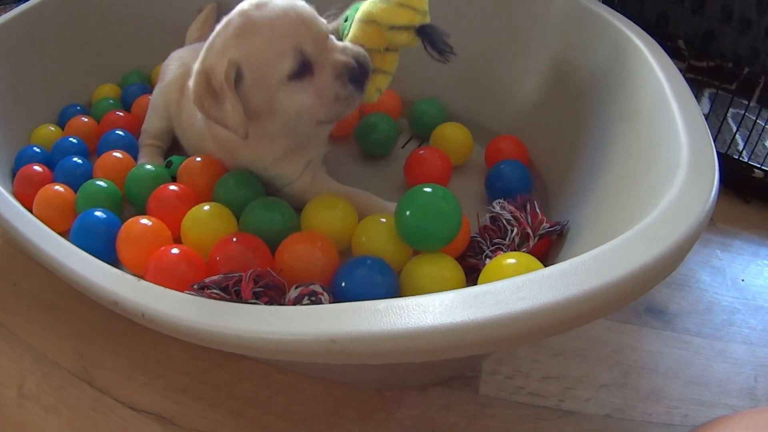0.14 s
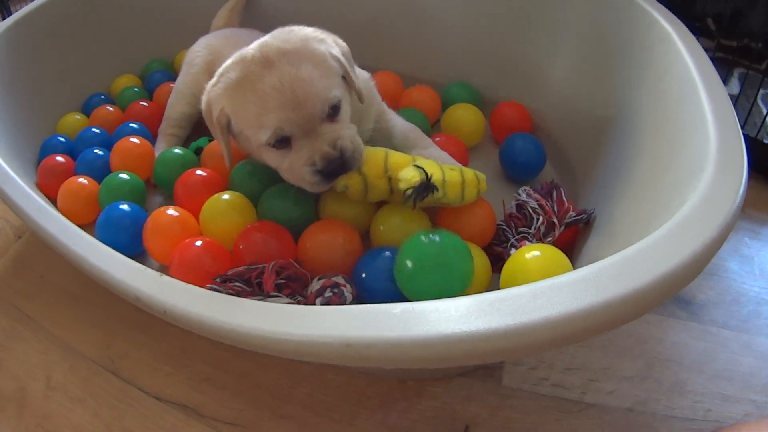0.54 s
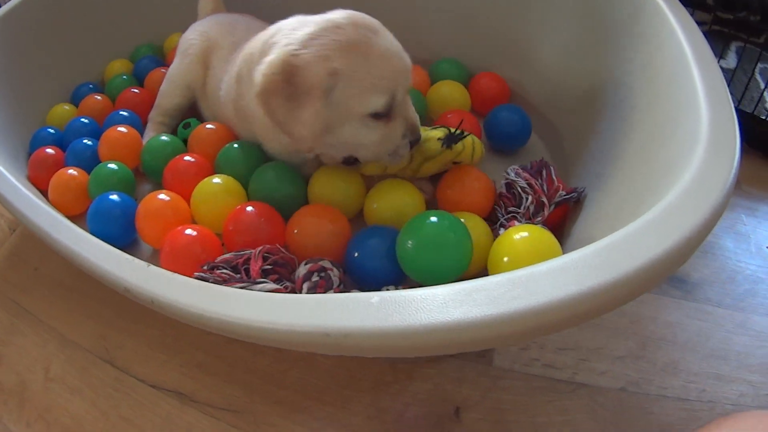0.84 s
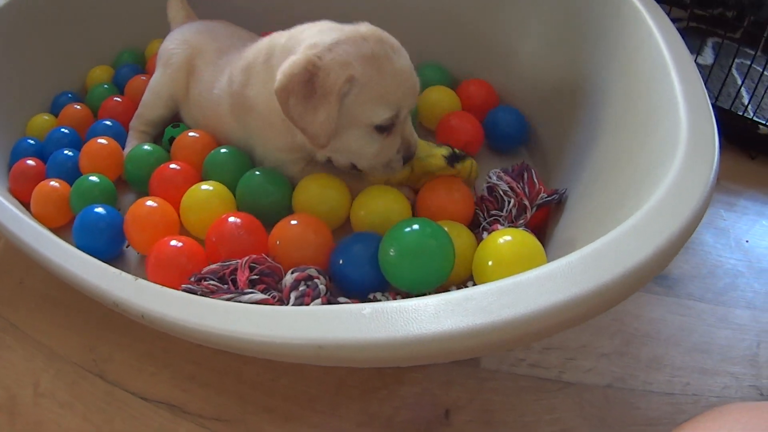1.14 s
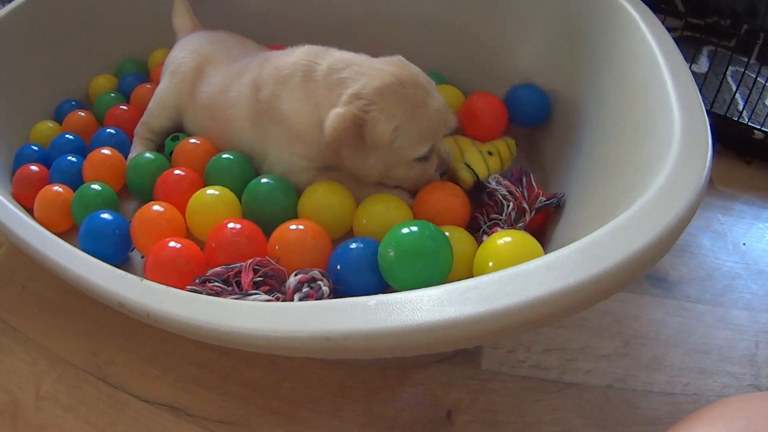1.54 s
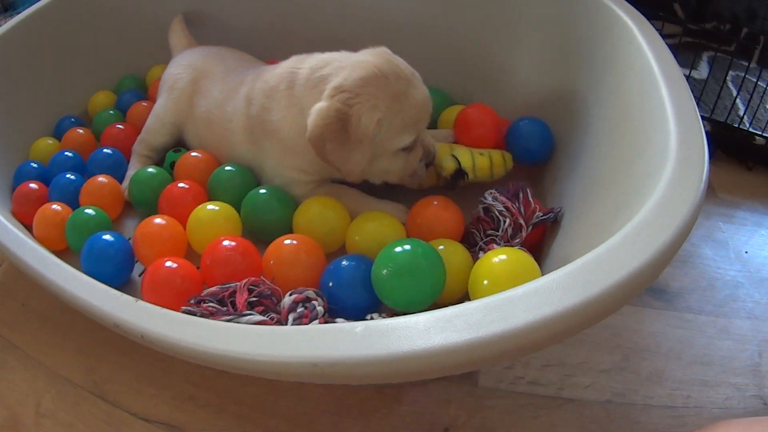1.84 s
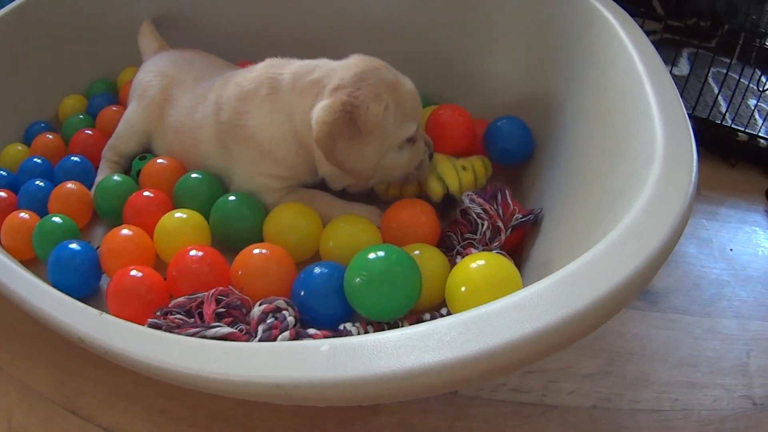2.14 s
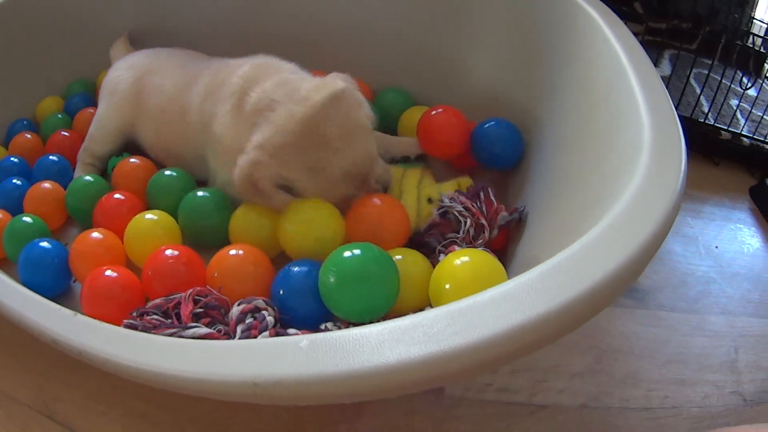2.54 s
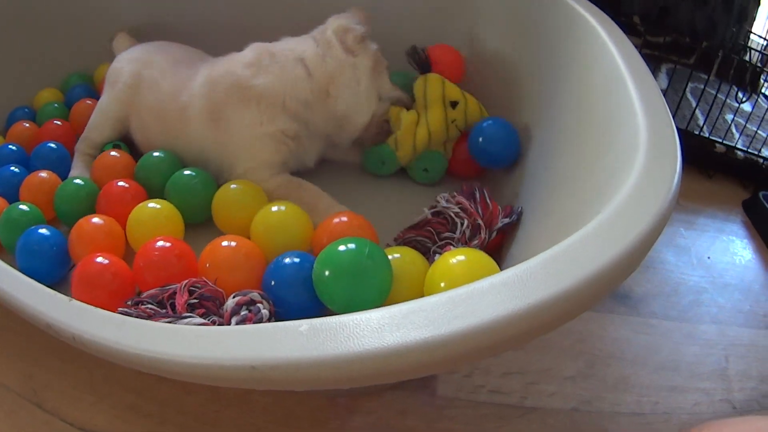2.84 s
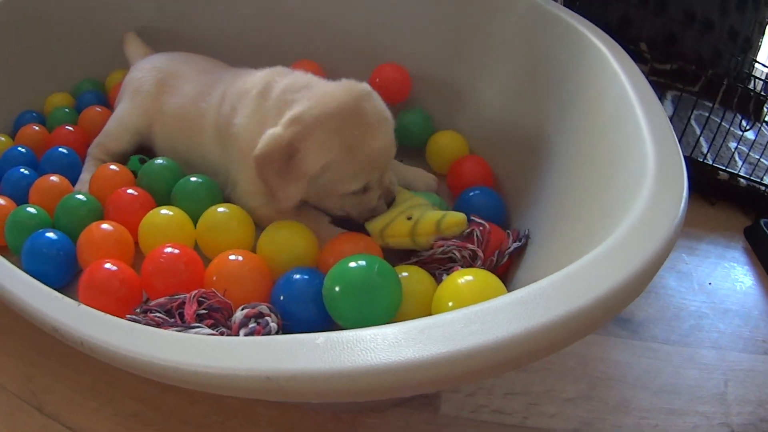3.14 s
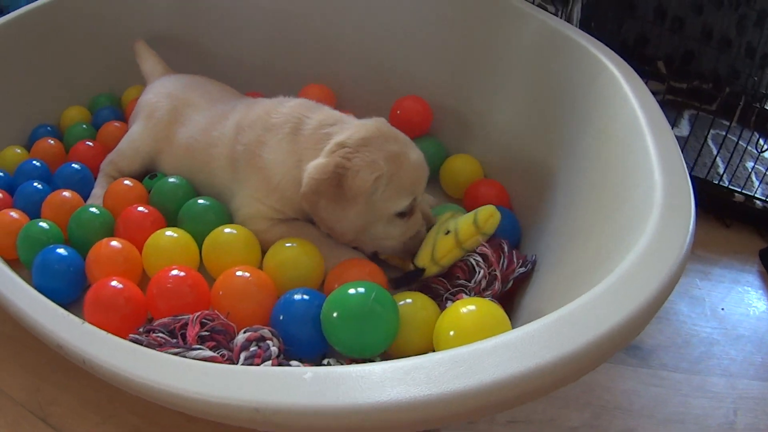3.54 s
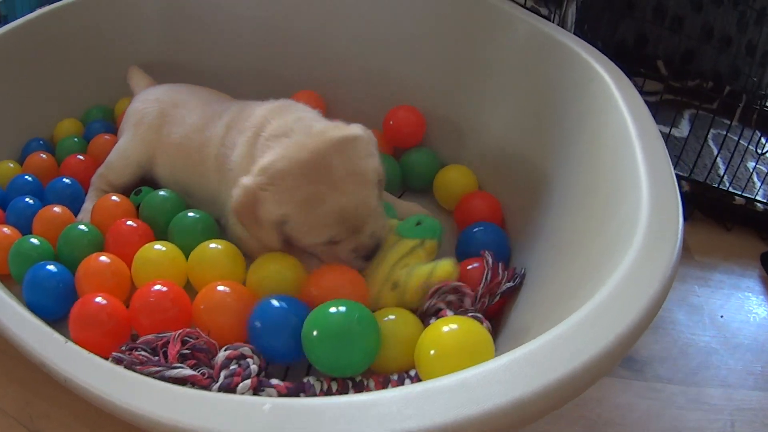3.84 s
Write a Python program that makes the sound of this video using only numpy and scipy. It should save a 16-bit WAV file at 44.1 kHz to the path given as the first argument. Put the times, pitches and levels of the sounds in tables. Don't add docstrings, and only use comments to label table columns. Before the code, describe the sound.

Hollow plastic balls clatter and thump in a plastic tub as a puppy shakes a soft toy, ease into sparse knocks, then burst out harder before settling; close stereo microphones, quiet room with low hum.

```python
import sys
import numpy as np
from scipy import signal
from scipy.fft import rfft, irfft
from scipy.io import wavfile
from scipy.ndimage import uniform_filter1d

SR = 44100
rng = np.random.default_rng(int(sys.argv[2]) if len(sys.argv) > 2 else 0)


def volts(x):
    e = np.asarray(x, float) / 20
    return 10 ** e


def wav_record(signal):
    frames = np.transpose(np.atleast_2d(signal))
    bounded = np.clip(frames, -1, 1)
    quanta = np.round(bounded * 32767).astype(np.int16)
    wavfile.write(sys.argv[1], SR, quanta)


N = 176400


def evened(x):
    return x / np.sqrt(np.mean(x ** 2) + 1e-20)


def read(points, hz):
    f, value = np.transpose(points)
    return np.interp(np.log(hz + 1), np.log(f + 1), value)


def shape(x, gain):
    return irfft(rfft(x) * gain(np.fft.rfftfreq(N, 1 / SR)), N)


def add(mix, start_s, sound):
    part = mix[max(round(start_s * SR), 0):][:len(sound)]
    part += sound[:len(part)]


def burst(hz, swell_s, power):
    t = np.arange(SR // 10) / SR
    swell = t / swell_s * np.exp((1 - (t / swell_s) ** power) / power)
    return swell * np.sin(2 * np.pi * hz * t)


def ring(hz, t60_s, rise_s):
    t = np.arange(SR // 10) / SR
    rise = np.sin(np.pi / 2 * np.minimum(t / rise_s, 1)) ** 2
    x = rise * volts(-60 * t / t60_s) * np.sin(2 * np.pi * hz * t)
    return x / abs(x).max()


def body(modes, rise_s, spread, vary_db):
    out = 0
    for hz, t60_s, db in modes:
        a, b = rng.standard_normal(2)
        out = out + volts(db + vary_db * b) * np.sign(a) * ring(hz * (1 + spread * a), t60_s, rise_s)
    return out


# pitch_hz, level_db
ROOM_COLOUR = [(25, -21), (55, -11.5), (110, -4), (230, -10.5), (570, -12.5), (1030, -17.5), (2600, -25),
               (11000, -34)]
# pitch_hz, likeness (0 to 1)
ROOM_LIKENESS = [(60, 1), (350, 0.98), (2000, 0.044), (11500, 0.78)]


def room():
    air_db, hum_db, overtone_db = -46, -48, -7.5
    hum_hz, hum_width_hz = 72, 10
    a, b, c = rng.standard_normal((3, N))

    def same(hz):
        return np.clip(read(ROOM_LIKENESS, hz), 0, 1)

    def peak(hz, k):
        return 1 / (1 + (2 * (hz - k * hum_hz) / hum_width_hz / k) ** 2)

    right = shape(a, same) + shape(b, lambda hz: np.sqrt(1 - same(hz) ** 2))
    air = evened(np.array([shape(v, lambda hz: volts(read(ROOM_COLOUR, hz))) for v in (a, right)]))
    hum = evened(shape(c, lambda hz: peak(hz, 0.99) + volts(overtone_db) * peak(hz, 2.04)))
    hum = evened(hum / uniform_filter1d(abs(hum), size=1500) ** .7)
    return volts(air_db) * air + volts(hum_db) * hum


# start_s, length_s, rolling_db, brushing_db
STIRS = [(-.03, 0.1, -34, -47), (0.08, 0.28, -34.5, -55), (0.385, 0.34, -40, -47), (0.461, 0.2, -32.5, -53),
         (0.61, 0.53, -46.5, -56), (1.158, 0.057, -42.5, -70), (1.252, 0.13, -39.5, -58),
         (1.385, 0.24, -40.5, -55), (1.54, 0.34, -44.5, -50.5), (1.677, 0.26, -38, -49.5),
         (1.882, 0.67, -49.5, -81), (2.508, 0.36, -31.5, -46), (2.757, 0.3, -34, -49),
         (3.014, 0.55, -35, -52.5), (3.423, 0.6, -50, -81), (3.71, 0.9, -43.5, -48.5)]


def stir(column):
    power = np.zeros(N)
    for row in STIRS:
        u = np.clip((np.arange(N) / SR - row[0]) / row[1], 0, 1)
        power += (volts(row[column]) * np.sin(np.pi * u ** .75)) ** 2
    return np.sqrt(power)


def clicks(per_s, spread_db):
    size = volts(spread_db * np.minimum(rng.exponential(1, N), 4))
    return size * (rng.random(N) < per_s / SR) * rng.choice([-1., 1.], N)


def crowd(hits, make):
    which = rng.integers(0, 10, N)
    return evened(sum(signal.oaconvolve(hits * (which == k), make())[:N] for k in range(10)))


# pitch_hz, width_hz, level_db
BALL = [(1657, 730, 10), (2950, 470, 2), (3555, 420, 4.5), (4000, 200, -5), (7300, 1400, -9)]


def shell(bright_db):
    scuff_s, snap_s = 0.0017, 0.00051
    t, hz = np.arange(1024) / SR, np.fft.rfftfreq(1024, 1 / SR)
    colour = 0
    for f, width, db in BALL:
        a, b = rng.standard_normal(2)
        colour = colour + volts(db + 4.4 * a) / (1 + 1j * 2 * (hz - f * (1 + 0.061 * b)) / width)
    scuff, snap = (rfft(rng.standard_normal(1024) * t / s * np.exp(-t / s)) for s in (scuff_s, snap_s))
    x = irfft(scuff * colour + snap * volts(bright_db + 8.0) * (hz > 5000))
    return x / abs(x).max()


# pitch_hz, t60_s, level_db
TUB = [(272, 0.12, -0.5), (190.8, 0.24, -10.5), (363.5, 0.081, -2), (460, 0.061, -2.5), (605, 0.017, 1.5),
       (813.4, 0.044, -3.5), (1135, 0.024, -9.5), (1434, 0.058, -18)]


def rolling():
    rolls_per_s, rattles_per_s = 330, 190
    bumps = crowd(clicks(rolls_per_s, 2.64), lambda: body(TUB, 0.0018, 0.071, 5.3))
    rattle = crowd(clicks(rattles_per_s, 2.7), lambda: shell(-13))
    return stir(column=2) * (bumps + volts(-12) * rattle)


# pitch_hz, level_db
BRUSH_COLOUR = [(700, -28), (1100, -7), (2400, -7.5), (3900, -1), (5700, -5.5), (10500, -9.5)]


def brushing():
    grains_per_s = 7400
    clumps = volts(3.24 * evened(uniform_filter1d(rng.standard_normal(N), size=250)))
    grains = clumps * (clicks(grains_per_s, 5.5) + 3 * rng.standard_normal(N))
    return stir(column=3) * evened(shape(grains, lambda hz: volts(read(BRUSH_COLOUR, hz))))


# start_s, level_db, snap_db
TICKS = [(0.0099, -25, -27), (0.0915, -26.5, -5), (0.1054, -20.5, 2), (0.154, -20, -4),
         (0.2698, -28.5, -42), (0.3033, -30, -35), (0.496, -22.5, -10), (0.532, -22.5, -23),
         (0.589, -20, -18), (0.6772, -31, -20), (0.7218, -32, -13), (1.266, -32, -28), (1.292, -31, -32),
         (1.3184, -30, -4), (1.5595, -33.5, -19), (1.707, -27, -4), (1.731, -30, -14),
         (1.7689, -22.5, -3.5)]
# start_s, level_db, snap_db
SHAKE_TICKS = [(2.573, -22.5, -9.5), (2.595, -28.5, -31), (2.6397, -19, -6), (2.7347, -24, -36),
               (2.8427, -19, -5.5), (2.9082, -19, -27), (2.9777, -21.5, -28), (3.0107, -14.5, -5.5),
               (3.049, -25.5, -7), (3.0676, -19.5, -19), (3.1486, -19, -7), (3.1743, -24.5, -8.5),
               (3.2234, -21, -10), (3.267, -22.5, -8), (3.299, -25, -13), (3.3515, -20.5, -19),
               (3.481, -25, -3.5), (3.7128, -26.5, -2.5), (3.7425, -32, 2)]


def ticks():
    out = np.zeros(N)
    for s, db, snap_db in TICKS + SHAKE_TICKS:
        add(out, s - .001, volts(db) * shell(snap_db))
        add(out, s + rng.uniform(0.0025, 0.0062), volts(db - 10.5) * shell(snap_db))
    return out


# start_s, level_db, swell_s
THUMPS = [(0.01, -18, 0.0094), (0.092, -19, 0.0059), (0.113, -12.5, 0.0054), (0.159, -18, 0.0092),
          (0.201, -22, 0.012), (0.232, -27.5, 0.015), (0.266, -23.5, 0.0086), (0.595, -23, 0.01),
          (0.83, -33, 0.011), (1.418, -31.5, 0.0088), (1.471, -28, 0.0055), (1.566, -29.5, 0.012),
          (2.571, -22, 0.0061), (2.602, -25.5, 0.01), (2.635, -21.5, 0.01), (2.678, -24.5, .006),
          (2.76, -29.5, 0.0066), (2.81, -22, 0.0074), (2.853, -21, .007), (2.941, -19, 0.0072),
          (3.016, -25, 0.0089), (3.151, -15, 0.0062), (3.346, -29.5, 0.011), (3.415, -31, 0.012),
          (3.482, -20.5, 0.0054)]


def thumps():
    out = np.zeros(N)
    for s, db, swell_s in THUMPS:
        floor = burst(TUB[0][0], swell_s, 1.74)
        add(out, s, volts(db) * (floor + volts(-13) * body(TUB[1:], 0.0015, 0.022, 4.5)))
    return out


# start_s, level_db, pitch_hz
TAPS = [(.105, -23, 570), (.507, -22, 574), (0.521, -24.5, 480), (0.556, -32, 507), (.619, -25, 497),
        (.644, -35, 700), (.798, -28, 548), (.934, -32.5, 590), (1.166, -40, 820), (1.291, -28.5, 587),
        (1.318, -31.5, 649), (1.432, -30, 730), (1.707, -30.5, 720), (1.733, -31, 554), (1.966, -34.5, 570),
        (2.55, -26.5, 645), (2.633, -22.5, 420), (2.699, -27, 501), (2.722, -26.5, 484),
        (2.751, -27.5, 626), (2.804, -25, 495), (2.945, -25, 420), (3.712, -30, 585), (3.3, -31, 810),
        (3.357, -30.5, 662), (3.824, -30, 890)]


def taps():
    swell_s = 0.0023
    out = np.zeros(N)
    for s, db, hz in TAPS:
        add(out, s, volts(db) * (burst(hz, swell_s, 1.4) + 0.54 * burst(hz * 1.825, swell_s * 0.33, 1)))
    return out


# start_s, level_db,
# pitch_hz, swell_cycles
JOLTS = [
    (.114, -27, 119, 0.24),
    (2.015, -38.5, 135, 2.1),
    (2.05, -34, 207, 2.35),
    (2.853, -27, 175, 1.9),
    (3.147, -29, 136, 0.29),
    (3.817, -26.5, 168, 0.19),
]


def jolts():
    out = np.zeros((2, N))
    for k, (s, db, hz, cycles) in enumerate(JOLTS):
        lean_db = 6.3 * (k == len(JOLTS) - 1)
        for side, channel in zip((.5, -.5), out):
            add(channel, s, volts(db + side * lean_db) * burst(hz, cycles / hz, 1))
    return out


# start_s, level_db, pitch_hz, swell_s
POPS = [(0.153, -14, 470, 0.0014), (0.4975, -17, 498, 0.0019), (0.541, -20, 834, 0.0038),
        (0.723, -26.5, 510, 0.0039), (0.899, -26.5, 396, 0.0026), (1.266, -25, 630, 0.0023),
        (1.416, -19, 587, 0.0019), (1.561, -25.5, 670, 0.0025), (1.786, -22, 605, 0.0031),
        (1.8285, -19.5, 604, 0.0018), (2.612, -17.5, 535, 0.0014), (2.642, -21, 571, 0.0041),
        (2.708, -27.5, 460, 0.004), (2.843, -8.5, 605, 0.0046), (2.885, -33, 593, 0.0043),
        (2.979, -20, 575, 0.0035), (3.049, -21, 450, 0.0036), (3.387, -20.5, 503, 0.00207),
        (3.533, -23.5, 380, 0.0034), (3.919, -34.5, 640, 0.003)]
# start_s, level_db, pitch_hz, swell_s
SLAPS = [(0.269, -20, 557, 0.0013), (0.589, -13.5, 434, 0.002), (0.736, -17.5, 516, 0.0015),
         (1.768, -9.5, 625, 0.0012), (1.81, -15, 650, 0.0015), (1.976, -31, 563, 0.00099),
         (2.909, -9, 618, 0.00292), (3.01, -8.5, 586, 0.0018), (3.064, -17.5, 496, 0.00262),
         (3.1482, -10.5, 450, 0.00174), (3.4795, -11.5, 477, 0.00189), (3.818, -20.5, 613, 0.00137)]


def pops():
    out = np.zeros(N)
    for s, db, hz, swell_s in POPS + SLAPS:
        overtone = (.0012 / swell_s) ** 2 * burst(hz * 1.72, swell_s * 0.39, 1)
        add(out, s, volts(db) * (burst(hz, swell_s, 2.7) + overtone))
        add(out, s + 2 * swell_s, volts(db - 13.0) * body(TUB[3:], 0.00061, 0.054, 0.73))
    return out


# start_s, level_db, pitch_hz
CLINKS = [(.199, -33, 4240), (0.225, -35.5, 3300), (.498, -23, 3600), (0.511, -25.5, 3470),
          (0.538, -26, 3220), (.61, -44, 3650), (.785, -36.5, 3680), (.889, -38.5, 3520), (1.28, -34, 2900),
          (1.285, -34, 3400), (1.301, -30, 3320), (1.33, -34, 4000), (1.345, -40, 4230), (1.493, -39, 3430),
          (1.5184, -35, 3150), (1.576, -33, 3780), (1.623, -37, 3700), (1.654, -32, 3830),
          (1.852, -44, 3600), (1.9648, -37, 2490), (2.5484, -34, 3500), (2.749, -27, 3550),
          (2.831, -23.5, 3650), (2.915, -32, 2950), (2.937, -32, 4120), (2.944, -30, 3060),
          (3.018, -28, 3580), (3.074, -33, 3830), (3.2493, -39, 3700), (3.33, -42, 3800), (3.91, -33, 3320)]


def clinks():
    swell_s = 0.00099
    out = np.zeros(N)
    for s, db, hz in CLINKS:
        upper = burst(hz * rng.uniform(1.08, 1.2), swell_s * 1.06, 1.1)
        add(out, s, volts(db - 5.5) * (burst(hz, swell_s, 1.43) + 0.72 * upper))
        add(out, s, volts(db - 1) * shell(4))
    return out


def echoes(x):
    t60_s, first_s = 0.28, .0015
    t, out = np.arange(.2 * SR) / SR, 0
    for k in range(3):
        hits = rng.standard_normal((2, len(t))) * (rng.random((2, len(t))) < .05)
        hits = hits * volts(-60 * t / t60_s) * (t > first_s)
        hits = signal.lfilter([1], [1, -.6], hits + 0.24 * hits[::-1])
        turn = np.cos(np.pi * (np.arange(N) / SR * 7.3 + k / 3)) * np.sqrt(2 / 3)
        out = out + signal.oaconvolve(turn * x[None], hits / np.linalg.norm(hits[0]), axes=1)[:, :N]
    side = shape((out[0] - out[1]) / 2, lambda hz: 2.0 * hz / (hz + 1200))
    return out.mean(0) + np.array([side, -side])


# pitch_hz, width_hz, level_db
SLIDE_COLOUR = [(6840, 800, 0), (9800, 1800, -2)]


def slide():
    start_s, rise_s, level_db = 3.75, .13, -52
    a, b = rng.standard_normal((2, N))

    def tone(hz):
        return sum(volts(db) / np.sqrt(1 + (2 * (hz - f) / w) ** 2) for f, w, db in SLIDE_COLOUR)

    pair = np.array([shape(a, tone), volts(-2) * shape(1.2 * a + .45 * b, tone)])
    return volts(level_db) * evened(pair) * np.clip((np.arange(N) / SR - start_s) / rise_s, 0, 1)


# pitch_hz, lead_radians
LEAD = [(30, -.6), (260, -.85), (1100, -.75), (1900, -.3), (2500, -1), (3500, -.4), (11000, -.5)]


def scene():
    tilt_db, echo_db = -2, -12
    tub = rolling() + brushing() + ticks() + thumps() + taps() + pops() + clinks()
    both = (tub + volts(echo_db) * echoes(tub)) * volts(np.array([[.5], [-.5]]) * tilt_db)
    both = both + room() + jolts() + slide()
    turned = [shape(v, lambda hz: np.exp(1j * side * read(LEAD, hz))) for v, side in zip(both, (.5, -.5))]
    return np.array(turned)


def roll_off(x):
    return signal.sosfilt(signal.butter(12, 12140, fs=SR, output="sos"), x)


def record(dry):
    edge_hz, leak_db = 11020, -29

    def edge(hz):
        return np.where(hz < edge_hz, 1, volts(leak_db - .004 * (hz - edge_hz)))

    mix = np.array([shape(v, edge) for v in dry])
    return roll_off(mix)


dry = scene()
out = record(dry)
wav_record(out)
```